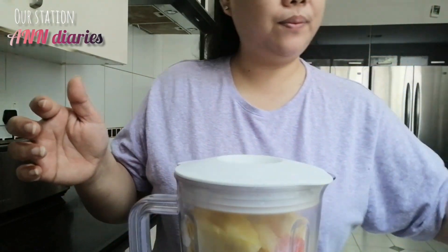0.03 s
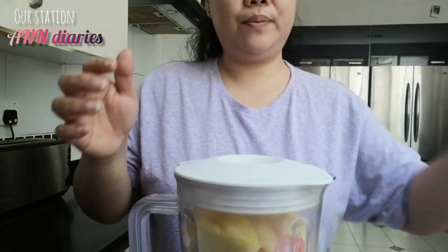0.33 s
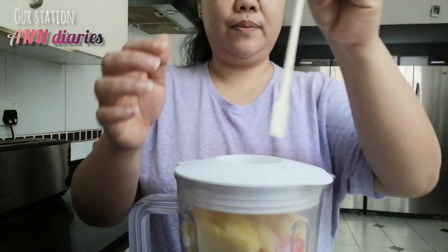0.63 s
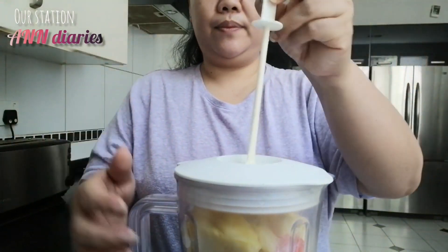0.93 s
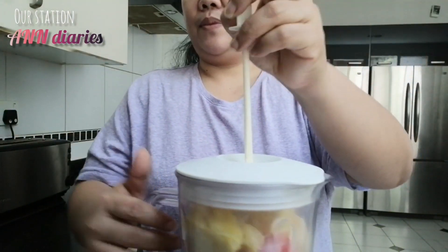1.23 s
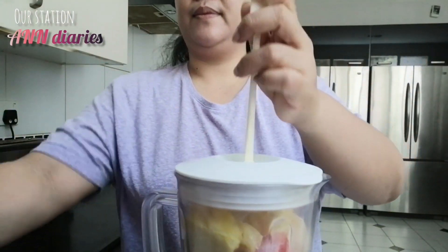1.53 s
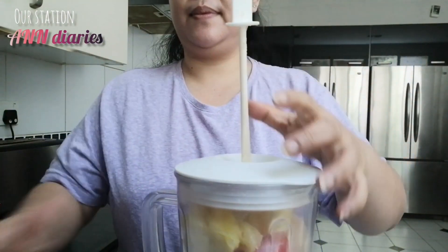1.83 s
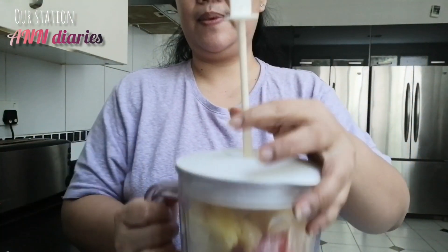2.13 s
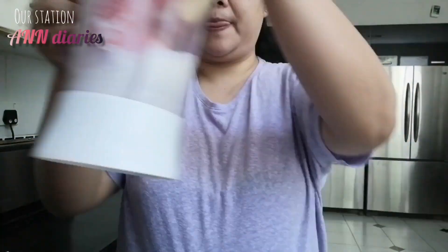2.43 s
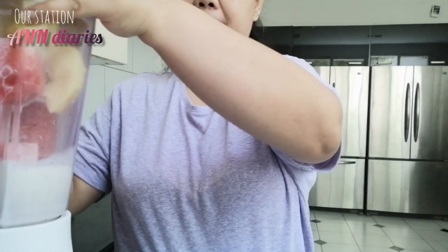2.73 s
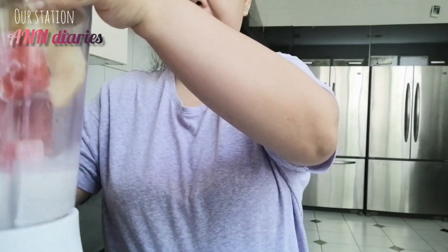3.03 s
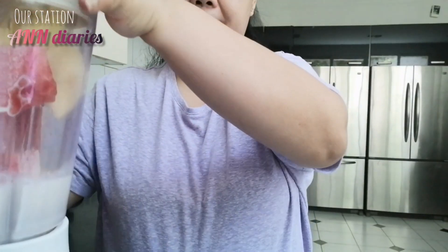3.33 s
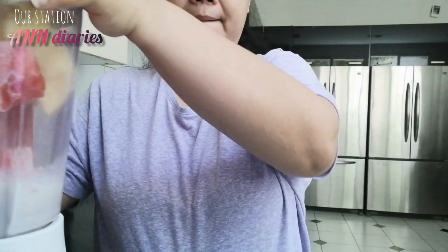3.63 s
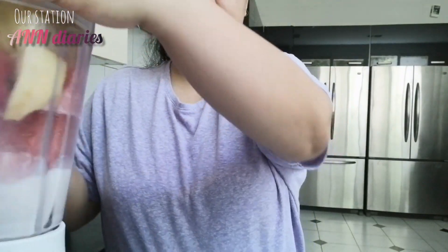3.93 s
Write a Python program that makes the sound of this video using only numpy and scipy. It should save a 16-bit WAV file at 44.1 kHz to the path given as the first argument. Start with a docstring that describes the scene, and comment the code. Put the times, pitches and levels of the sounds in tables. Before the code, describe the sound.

A plastic blender jug is handled in a quiet kitchen. After a faint metallic ring, a stick taps and slides through the lid, then the jug knocks, scrapes and clatters onto its base, close by.

```python
"""In a quiet kitchen a plastic stirring stick is picked up, leaving something metal ringing.
The stick taps a blender lid and slides through it in two strokes. Just after two seconds, hands lift
the full jug onto its motor base. It is twisted, scraping and groaning, until it seats near the end.
All along plastic clicks and clatters, the heavier knocks ring the jug and set the base thudding on
the counter, and a small hard room answers."""
import sys
import numpy as np
from scipy import signal
from scipy.fft import rfft, irfft
from scipy.io import wavfile
from scipy.ndimage import uniform_filter1d

SR = 44100
rng = np.random.default_rng(int(sys.argv[2]) if len(sys.argv) > 2 else 0)


def inscribe(sig):
    """Save sig as 16-bit PCM at rate SR to the path in sys.argv[1].

    A 1-D sig is mono; a 2-D sig holds one channel per row.
    Samples are clipped to [-1, 1] before scaling.
    """
    pcm = np.round(np.clip(np.atleast_2d(sig).T, -1, 1) * 32767)
    wavfile.write(sys.argv[1], SR, pcm.astype(np.int16))


N = 176400
CLICK_RISE_S, SCUFF_RISE_S = 0.0006, 0.0037  # how fast sharp and glancing hits swell
RUB_GRAIN_DB = 1  # roughness of rubbing


def amp(db):
    """Turns decibels into a gain."""
    return 10 ** (np.asarray(db) / 20)


def unit(x):
    """Scales a signal to an average (rms) level of 1."""
    return x / np.sqrt(np.mean(x ** 2) + 1e-20)


def read(points, hz):
    """Looks up a table on a log-frequency axis."""
    f, value = np.transpose(points)
    return np.interp(np.log(hz + 1), np.log(f + 1), value)


def add(mix, s, sound):
    """Mixes a sound in, starting at s seconds."""
    part = mix[:, max(round(s * SR), 0):][:, :sound.shape[-1]]
    part += sound[..., :part.shape[1]]


# how alike left and right are (frequency [Hz], likeness [0 to 1])
LIKENESS = [(260, 0.94), (700, 0.57), (1500, 0.047), (5000, 0.18), (9000, 0.11), (15000, 1)]


def white(size):
    """Even hiss in two partly alike channels."""
    hz = np.fft.rfftfreq(size, 1 / SR)
    left, other = np.exp(2j * np.pi * rng.random((2, len(hz))))
    same = np.clip(read(LIKENESS, hz), -1, 1)
    right = same * left + np.sqrt(1 - same ** 2) * other
    return unit(irfft(np.array([left, right]), size))


def noise(colour, size, band=(0, SR)):
    """Hiss shaped by a colour (a level for each frequency) and kept within a band."""
    hz = np.fft.rfftfreq(size, 1 / SR)
    inside = (hz >= band[0]) & (hz < band[1])
    return unit(irfft(rfft(white(size)) * amp(read(colour, hz)) * inside, size))


def grain(depth_db, size, count):
    """Surfaces catch and slip: a gain that wobbles about every count samples."""
    wobble = unit(uniform_filter1d(rng.standard_normal(size), count))
    return unit(amp(depth_db * wobble))


def ring(tones, rise_s):
    """One blow starts all of an object's tones; each dies by 60 dB in its fade time."""
    t = np.arange(SR) / SR
    waves = sum(amp(db - 60 * t / fade_s) * np.sin(2 * np.pi * hz * t) for hz, db, fade_s in tones)
    return (1 - np.exp(-t / rise_s)) * waves


def slide(curve, colour):
    """Rubbing on plastic: rough hiss that follows a loudness curve."""
    s, db = np.transpose(curve)
    loudness = amp(np.interp(np.arange(N) / SR, s, db, left=-120, right=-120))
    return loudness * noise(colour, N) * grain(RUB_GRAIN_DB, N, count=40)


# colour of the room's hum (frequency [Hz], level [dB])
HUM_COLOUR = [(15, -46), (25, -12), (102, -7), (127, -15), (161, 0.5), (300, -19), (416, -17.5),
              (1650, -36), (16000, -45)]
HUM_DB = -55.5


def room_hum():
    """Faint, steady, low noise behind everything."""
    return amp(HUM_DB) * noise(HUM_COLOUR, N)


# how long the echo lasts (frequency [Hz], fade time [s])
ECHO_FADE = [(100, 0.6), (1000, 0.65), (3000, 0.81), (5800, 0.7), (10000, 0.75), (16000, 0.28)]
# colour of the echo (frequency [Hz], level [dB])
ECHO_COLOUR = [(100, -12), (350, -6.5), (540, -6), (800, -7.5), (1150, -7), (3000, -8.5), (4300, -12.5),
               (5800, -10.5), (8300, -15), (10000, -13)]
EARLY_DB, EARLY_S = -18.5, 0.02


def kitchen_echo(sound):
    """Sound bounces off counter and cupboards, then dies away in a short tail."""
    t = np.arange(SR) / SR
    hz, when, spectrum = signal.stft(white(SR), SR, nperseg=512)
    fade_s = read(ECHO_FADE, hz)[:, None]
    spectrum *= amp(read(ECHO_COLOUR, hz)[:, None] - 60 * when / fade_s)
    spectrum *= np.sqrt(2 * np.log(1000) / fade_s / SR)  # a longer fade adds no energy
    swell = 1 - np.exp(-(t / EARLY_S) ** 2)
    tail = signal.istft(spectrum, SR, nperseg=512)[1][:, :SR] * swell
    early = unit(white(SR) * t * np.exp(-2 * t / EARLY_S)) / np.sqrt(SR)
    return signal.fftconvolve(sound, tail + amp(EARLY_DB) * early, axes=1)[:, :N]


# hands sliding on the jug (time [s], level [dB])
HAND_SLIDE = [(2.25, -74), (2.3, -60.5), (2.42, -69)]
# colour of a light rub, by hand or stick (frequency [Hz], level [dB])
LIGHT_RUB_COLOUR = [(350, -7), (600, -18), (1850, -8.5), (3730, -12.5), (5400, -4.5), (16000, -32.5)]


def hands():
    """Hands slip softly on the jug as they lift it."""
    return slide(HAND_SLIDE, LIGHT_RUB_COLOUR)


# taps on the metal as the stick is taken (time [s], level [dB])
METAL_HITS = [(.001, -39.5), (.019, -43.5), (.044, -43.5)]
# the metal's tones (pitch [Hz], level [dB], fade time [s])
METAL_TONES = [(2020, -15.5, 0.3), (3563, -3, 0.24), (4199, -12, 0.35), (5830, 5, 0.25), (7360, -11, 0.34),
               (8900, -7.5, 0.31), (10000, -11, 0.16), (11200, -8, 0.16), (15000, -12, 0.15)]
# colour of its jingle (frequency [Hz], level [dB])
JINGLE_COLOUR = [(900, -38), (2030, -18.5), (4800, -14), (5600, -1.5), (6600, -11.5), (8200, -10.5),
                 (9700, -9.5), (15000, -24)]
JINGLE_DB, JINGLE_S, METAL_SPLIT = -4.5, 0.054, 0.00846


def metal():
    """Thin metal is tapped: each tone splits into a close, wavering pair, over a faint jingle."""
    out, t = np.zeros((2, N)), np.arange(SR) / SR
    for s, db in METAL_HITS:
        pairs = [(hz * (1 + METAL_SPLIT * rng.standard_normal()), level, fade_s)
                 for hz, level, fade_s in METAL_TONES for _ in range(2)]
        jingle = amp(JINGLE_DB) * noise(JINGLE_COLOUR, SR) * np.exp(-t / JINGLE_S)
        add(out, s, amp(db) * (.5 * ring(pairs, CLICK_RISE_S) + jingle))
    return out


# the stick hitting the lid (time [s], level [dB])
STICK_HITS = [(.7945, -27.5), (1.682, -34.5)]
# tones of that tap (pitch [Hz], level [dB], fade time [s])
TAP_TONES = [(226, -3.5, 0.088), (882, -1, 0.034), (1098, -1, 0.029)]


def stick_taps():
    """The stick's tip taps the lid with a very brief ring."""
    out = np.zeros((2, N))
    for s, db in STICK_HITS:
        add(out, s, amp(db) * ring(TAP_TONES, CLICK_RISE_S))
    return out


# the stick's first stroke (time [s], level [dB])
FIRST_STROKE = [(1.12, -71), (1.145, -48), (1.215, -42), (1.255, -65)]
# its second, longer stroke (time [s], level [dB])
SECOND_STROKE = [(1.47, -50), (1.5, -53), (1.55, -50.5), (1.645, -44), (1.675, -55), (1.73, -54),
                 (1.815, -41.5), (1.86, -63)]
# colour of the second stroke (frequency [Hz], level [dB])
STROKE_COLOUR = [(150, -36), (330, -16), (1670, -14.5), (2620, -8), (3980, -15), (5440, -5.5), (7700, -15),
                 (16000, -24)]


def stick_slides():
    """The stick rubs through the lid twice, plastic on plastic."""
    return slide(FIRST_STROKE, LIGHT_RUB_COLOUR) + slide(SECOND_STROKE, STROKE_COLOUR)


# the jug turning in the base (time [s], level [dB])
JUG_TURN = [(3.07, -61.5), (3.17, -46.5), (3.23, -55), (3.3, -76)]
# colour of its scraping foot (frequency [Hz], level [dB])
FOOT_COLOUR = [(1000, -17), (4300, -21.5), (5250, -16), (5620, -1), (6100, -17), (7700, -34)]


def jug_scrape():
    """The jug's foot scrapes round in the base with a thin, high hiss."""
    return slide(JUG_TURN, FOOT_COLOUR)


def jug_groan(start_s=3.255, length_s=0.052, db=-41.5, from_hz=640, to_hz=435):
    """The turning jug rubs out one short, hollow, falling note."""
    out, size = np.zeros((2, N)), round(length_s * SR)
    cycles = np.cumsum(np.linspace(from_hz, to_hz, size)) / SR
    note = np.hanning(size) * np.sin(2 * np.pi * cycles)
    add(out, start_s, amp(db) * note * grain(RUB_GRAIN_DB, size, count=200))
    return out


# sharp plastic hits (time [s], five band levels from low to high [dB], decay [s])
SHARP_HITS = [(0.7935, -45.5, -48, -52, -54, -68, 0.0028), (1.027, -74, -76, -73, -61.5, -76, 0.0059),
              (1.6812, -50, -40, -36, -35.5, -40, 0.0038), (1.815, -48, -63, -51, -47, -58, 0.0091),
              (1.9322, -62, -74, -82, -60, -37, 0.0011), (1.947, -81, -78, -85, -52, -57, 0.0028),
              (2.0432, -62, -66, -55, -39, -50, 0.0017), (2.163, -53.5, -54, -53.5, -48.5, -65, 0.0075),
              (2.662, -43.5, -48, -42, -42.5, -53, 0.015), (2.6815, -37, -43, -36, -36, -46, 0.0083),
              (2.996, -57, -63, -52.5, -63, -77, 0.0032), (3.0355, -33.5, -37, -34, -36, -55, 0.0045),
              (3.059, -72, -54, -53, -39.5, -53, 0.00076), (3.337, -57, -59, -57, -52.5, -71, 0.0045),
              (3.388, -65, -73, -50, -52.5, -67, 0.019), (3.572, -71, -57, -47, -48, -63, 0.0054),
              (3.614, -43.5, -54, -38, -37, -53, 0.002), (3.7755, -45, -37, -32.5, -29.5, -37, 0.0079)]
# glancing hits that swell more slowly (time [s], five band levels [dB], decay [s])
GLANCING_HITS = [(0.545, -63, -66, -63.5, -63, -66, 0.0051), (0.855, -45.5, -57, -50, -53, -68, 0.01),
                 (1.477, -45, -56, -40, -45, -59, 0.011), (1.489, -34.5, -47, -39, -42, -57, 0.017),
                 (1.604, -35.5, -42.5, -40, -38, -49.5, 0.0049), (2.929, -58, -68, -44.5, -44, -57, 0.0028),
                 (3.457, -40, -46, -34.5, -39, -61, 0.0099), (3.467, -34.5, -37.5, -35.5, -35, -50, 0.0077),
                 (3.488, -31, -31.5, -35, -39, -51.5, 0.0033), (3.689, -40, -40, -45, -46.5, -58.5, 0.014),
                 (3.754, -38.5, -47, -35, -33, -45, 0.0031)]
# borders of the five bands (frequency [Hz])
BAND_BORDERS = [280, 700, 1500, 4200, 7800, 16500]
# how much longer each band rings (extra decay [s])
BAND_EXTRA_DECAY = [0.0086, 0.0049, 0.003, 0.0019, 0.0028]
# colour of struck plastic (frequency [Hz], level [dB])
PLASTIC_COLOUR = [(250, -9), (354, 6.5), (436, -12.5), (519, 2.5), (586, -10.5), (860, -22), (1060, -13.5),
                  (1470, -22), (1950, -12), (2160, -19), (3060, -11.5), (3980, -23.5), (5730, -15),
                  (7980, -38.5), (10000, -39), (16000, -58.5)]
CLICK_DB, SCUFF_DB, CHATTER_DB = 0.5, -1.5, 2.5


def plastic_hits(hits, rise_s):
    """Plastic meets plastic: a rough burst that dies fast, slower in the low bands."""
    out, t = np.zeros((2, N)), np.arange(4096) / SR
    head = round(.02 * SR)  # the first 20 ms set a burst's level
    for s, *levels, decay_s in hits:
        chatter = grain(CHATTER_DB, len(t), count=48)
        for band, db in enumerate(levels):
            shape = (1 - np.exp(-t / rise_s)) * np.exp(-t / (decay_s + BAND_EXTRA_DECAY[band]))
            burst = noise(PLASTIC_COLOUR, len(t), BAND_BORDERS[band:band + 2]) * shape
            if band > 1:  # only the top three bands chatter
                burst *= chatter
            add(out, s, amp(db) * burst / np.std(burst[:, :head]))
    return out


# jug or stick landing (time [s], base thud [dB], jug ring [dB], low push [dB], favoured pitch [Hz])
LANDINGS = [(.003, -42, -40, -67, 347), (.04, -64, -47, -69, 335), (.862, -45, -37.5, -62, 278),
            (1.480, -35, -51, -35, 200), (1.498, -53, -28, -29, 534), (1.528, -33.5, -39, -24.5, 407),
            (2.049, -55, -40, -45, 196), (2.072, -44, -40, -56, 260), (2.686, -26.5, -26, -30, 330),
            (2.697, -27.5, -23, -44, 526), (2.772, -42, -26, -44, 300), (3.040, -24, -21.5, -38, 360),
            (3.145, -34.5, -41, -45, 520), (3.353, -53, -33, -44, 330), (3.460, -33.5, -22.5, -30, 400),
            (3.493, -24.5, -18.5, -20.5, 323), (3.617, -36, -35.5, -54, 240),
            (3.688, -28.5, -23.5, -40, 257), (3.78, -18, -24.5, -46, 607)]
# tones of the motor base (pitch [Hz], level [dB], fade time [s])
BASE_TONES = [(94.6, 2, 0.28), (166, -12.5, 0.13), (61, -10, 0.34)]
# tones of the hollow jug (pitch [Hz], level [dB], fade time [s])
JUG_TONES = [(184, 2, 0.096), (232.4, -1, 0.1), (329.3, 2, 0.081), (366.4, -5, 0.082), (520.8, 0, 0.07),
             (774, -6.5, 0.034), (1044, -6.5, 0.047)]
THUD_RISE_S, JUG_RISE_S, PUSH_S = 0.0014, 0.0016, 0.0027
FAVOUR_DB_PER_OCTAVE = 8.5  # jug tones far from the pitch that the struck spot favours ring less
PITCH_SHIFT = 0.032  # grip and sloshing fruit shift each tone by about this share per blow


def knocks():
    """A landing weight shoves the counter, bounces the base on its feet and rings the jug."""
    out, age = np.zeros((2, N)), np.arange(SR) / SR / PUSH_S
    push = 2 * age * (2 - age) * np.exp(-age)  # one shove and its rebound
    shifts = 1 + PITCH_SHIFT * rng.standard_normal((len(LANDINGS), len(JUG_TONES)))
    for (s, base_db, jug_db, push_db, favoured_hz), shift in zip(LANDINGS, shifts):
        base = [(hz * k, db, fade_s) for (hz, db, fade_s), k in zip(BASE_TONES, shift)]
        jug = [(hz * k, db - FAVOUR_DB_PER_OCTAVE * abs(np.log2(hz / favoured_hz)), fade_s)
               for (hz, db, fade_s), k in zip(JUG_TONES, shift)]
        add(out, s, amp(push_db) * push)
        add(out, s, amp(base_db) * ring(base, THUD_RISE_S))
        add(out, s, amp(jug_db) * ring(jug, JUG_RISE_S))
    return out


def scene():
    """All the handling sounds and their echo, over the room's quiet hum."""
    near = amp(CLICK_DB) * plastic_hits(SHARP_HITS, CLICK_RISE_S)
    near += amp(SCUFF_DB) * plastic_hits(GLANCING_HITS, SCUFF_RISE_S)
    near += stick_slides() + hands() + jug_scrape()
    near += knocks() + stick_taps() + jug_groan() + metal()
    return near + kitchen_echo(near) + room_hum()


# how the microphone's two openings differ (frequency [Hz], left minus right [dB])
BALANCE = [(60, 5.5), (770, 5), (1170, 0.5), (2740, 4), (6410, 14), (9810, -13.5), (15000, 8.5)]
RIGHT_DELAY_S, TOP_HZ = 0.00015, 15900


def record(dry):
    """Two microphone openings differ in colour and arrival time; the highest treble is cut."""
    size = N + SR // 4
    hz = np.fft.rfftfreq(size, 1 / SR)
    lean = amp(read(BALANCE, hz))
    delay = np.exp(-2j * np.pi * hz * RIGHT_DELAY_S)
    openings = np.array([lean, delay]) * 2 / (1 + lean)
    heard = irfft(rfft(dry, size) * openings, size)[:, :N]
    treble_cut = signal.firwin(511, TOP_HZ, window=("kaiser", 9), fs=SR)
    return signal.oaconvolve(heard, treble_cut[None], "same")


dry = scene()
out = record(dry)
inscribe(out)
```